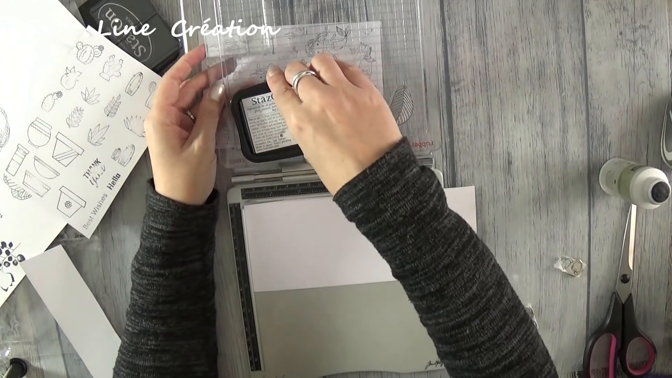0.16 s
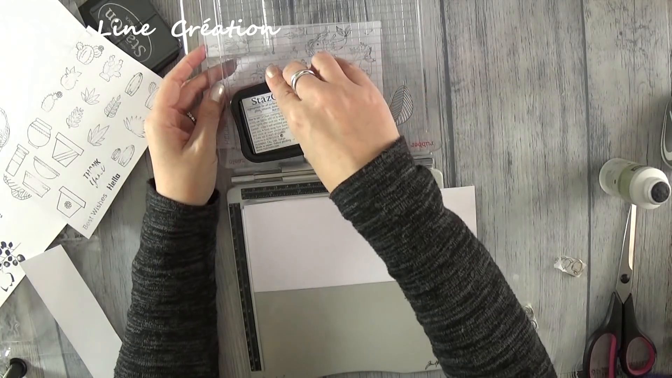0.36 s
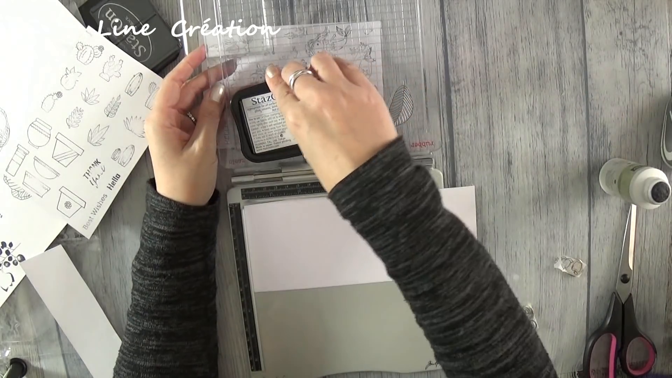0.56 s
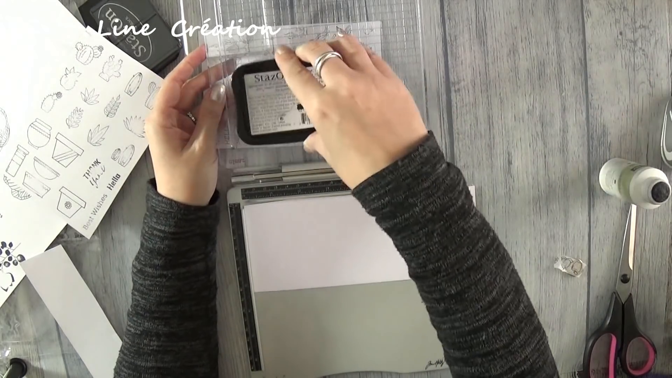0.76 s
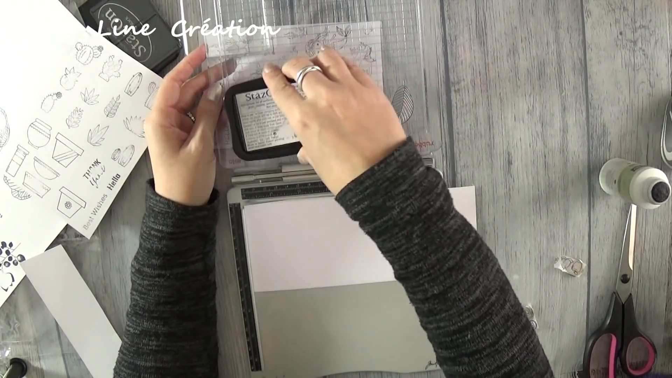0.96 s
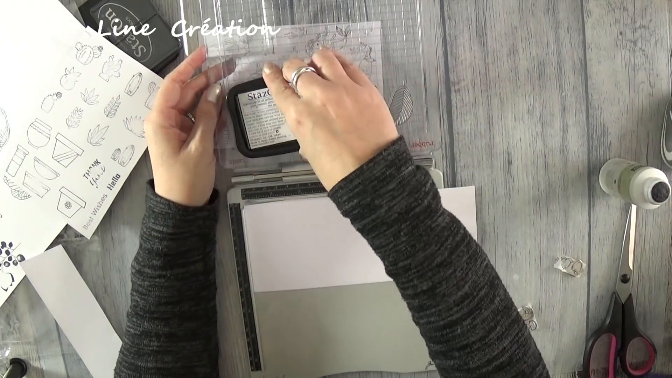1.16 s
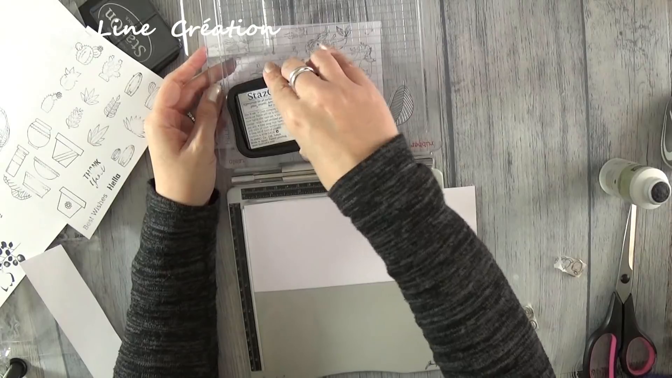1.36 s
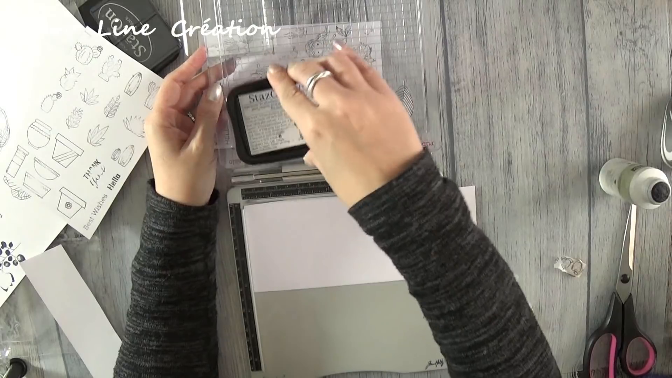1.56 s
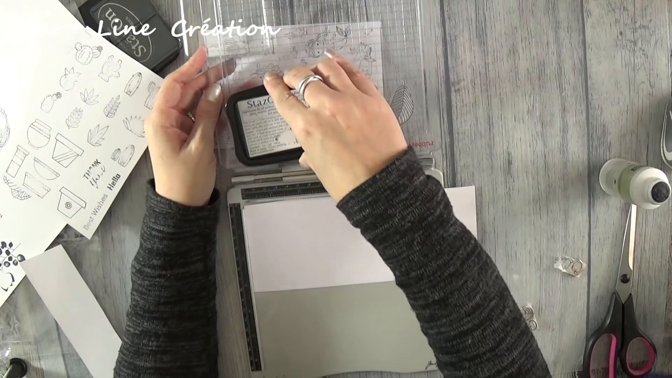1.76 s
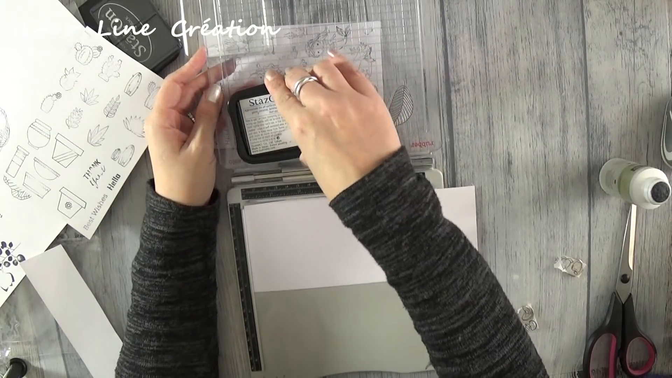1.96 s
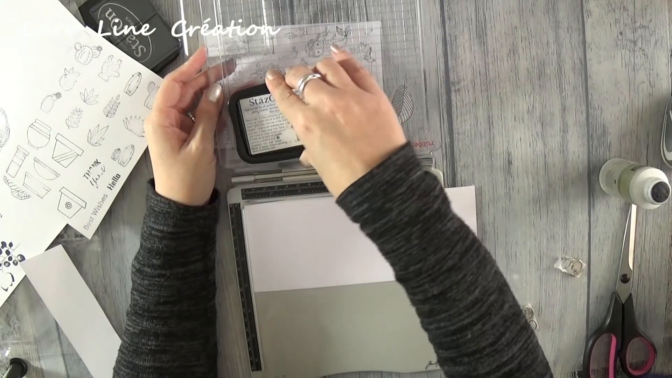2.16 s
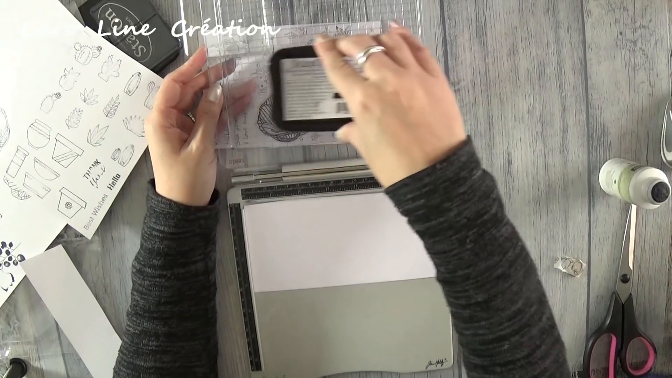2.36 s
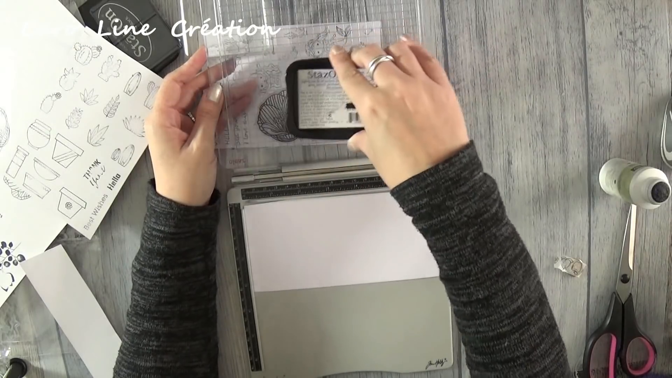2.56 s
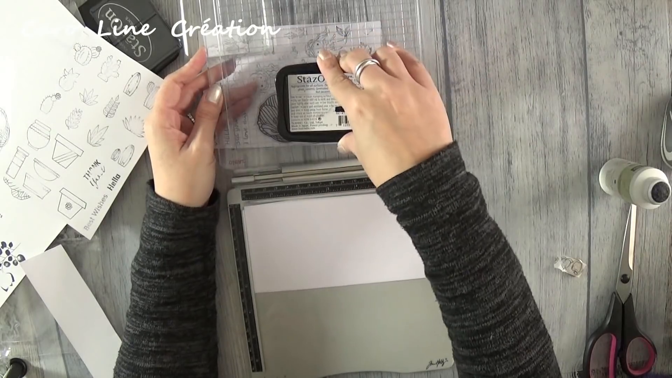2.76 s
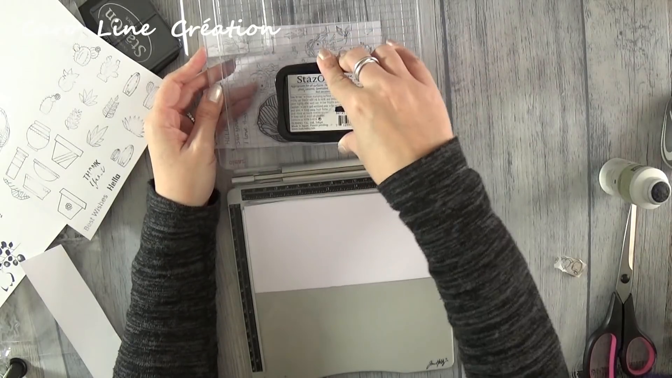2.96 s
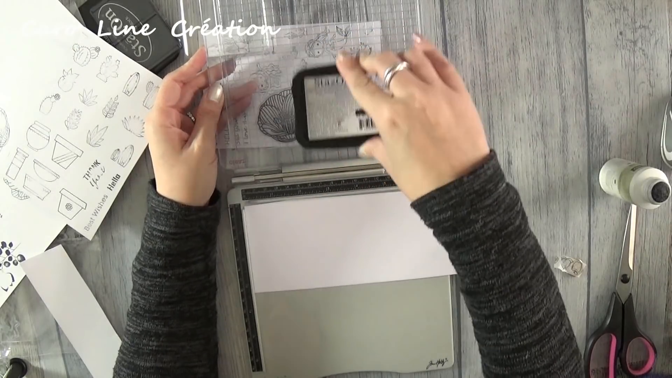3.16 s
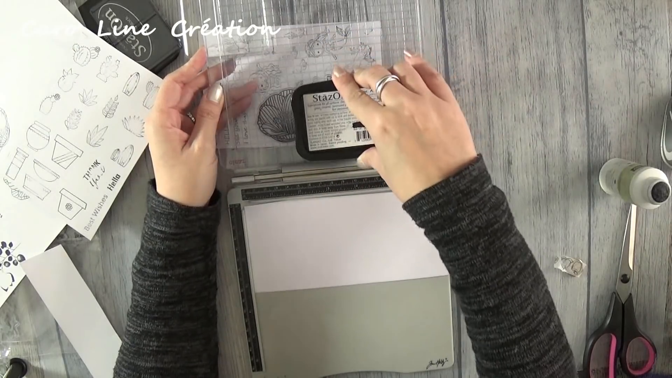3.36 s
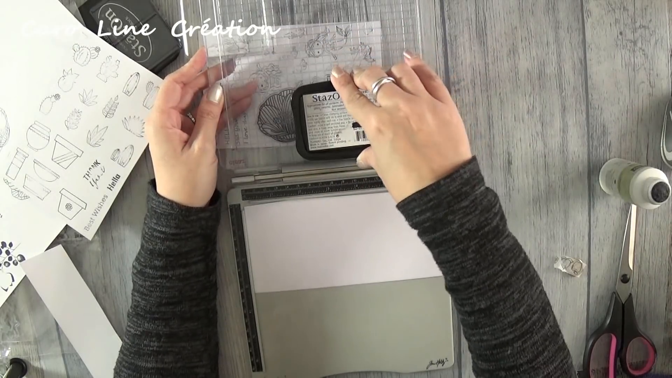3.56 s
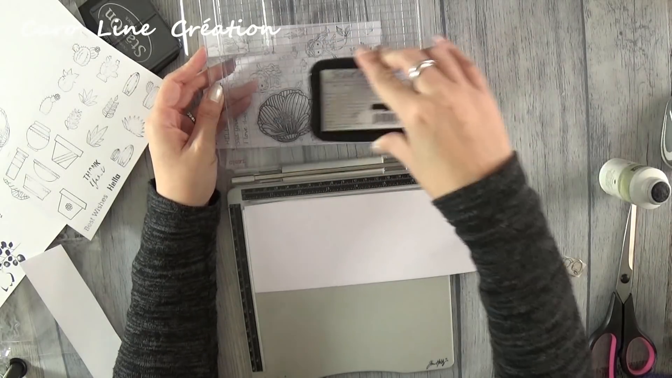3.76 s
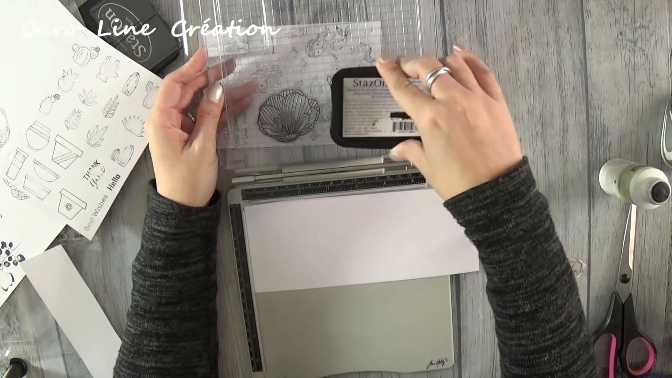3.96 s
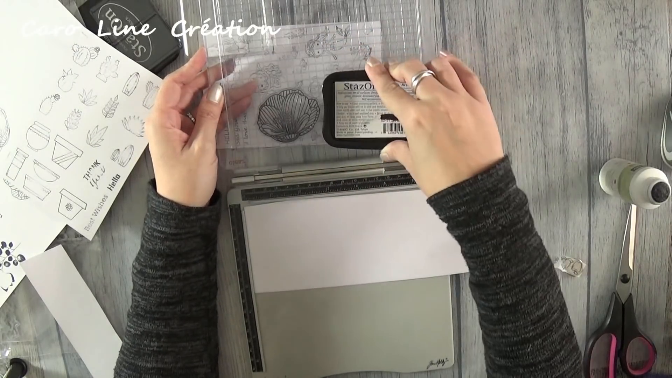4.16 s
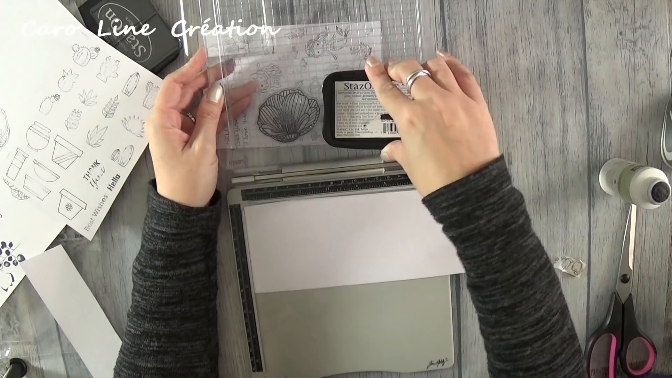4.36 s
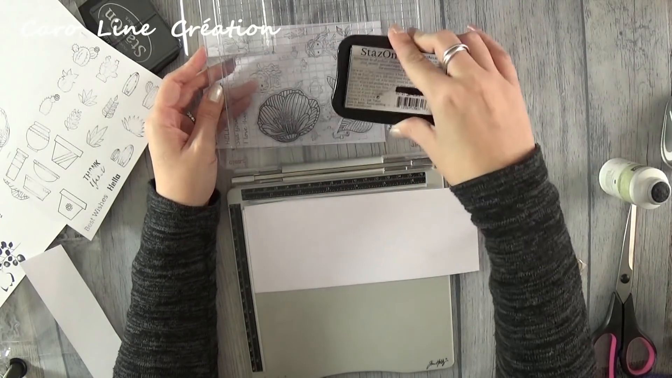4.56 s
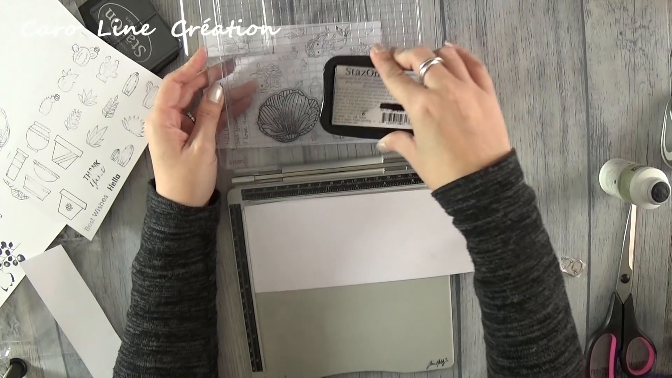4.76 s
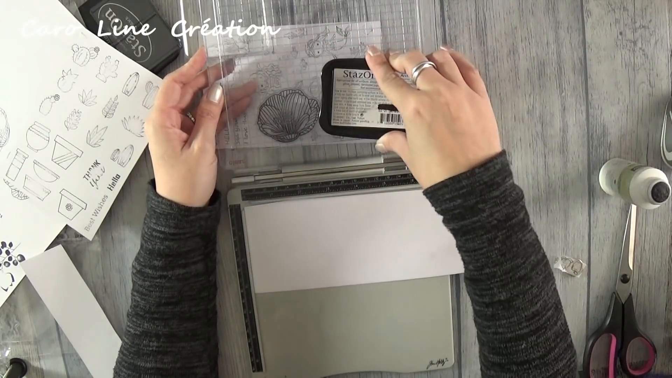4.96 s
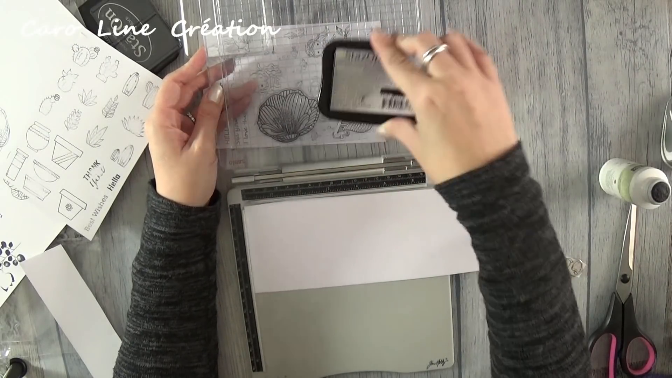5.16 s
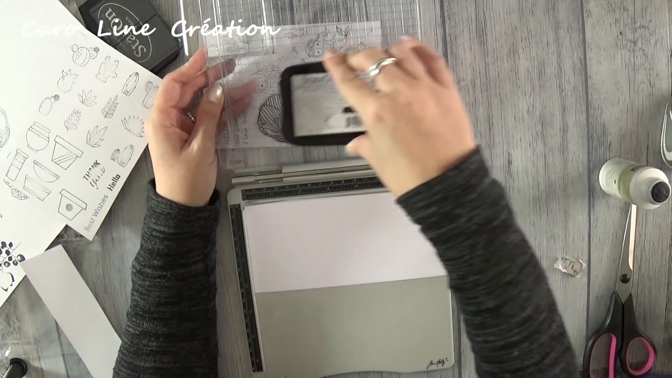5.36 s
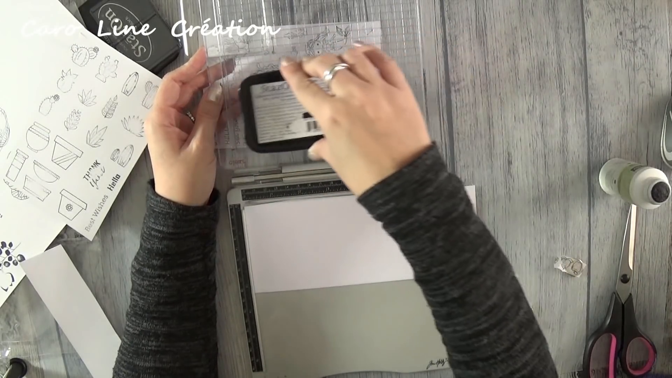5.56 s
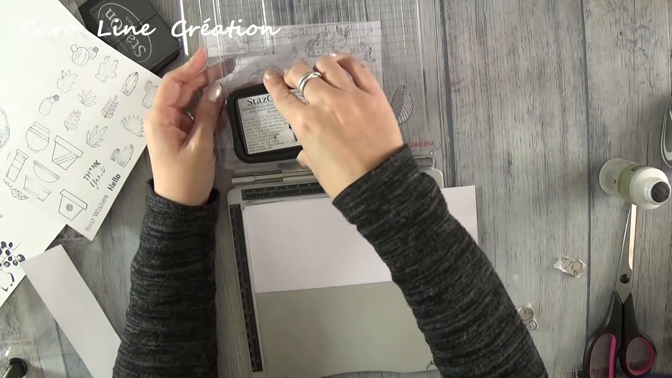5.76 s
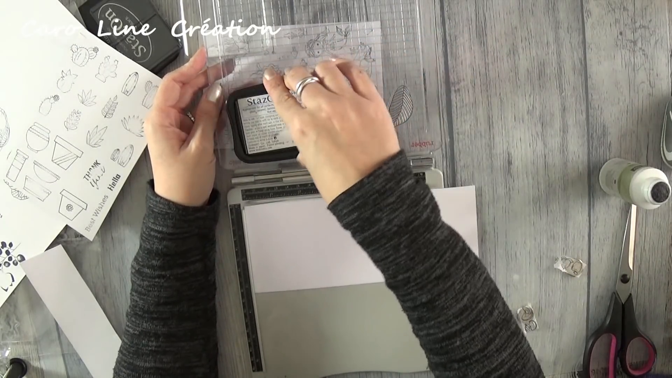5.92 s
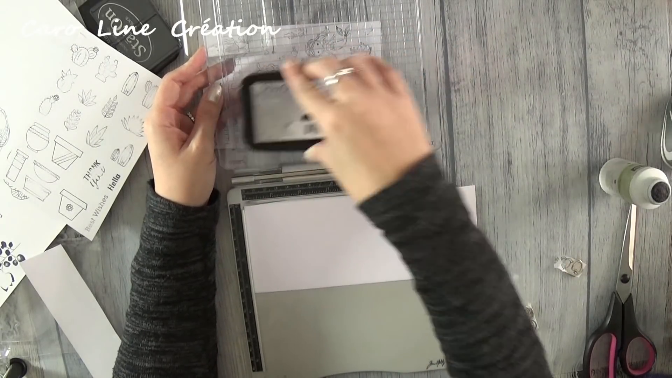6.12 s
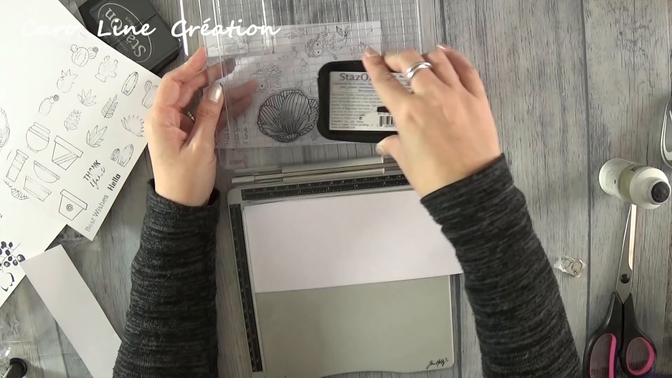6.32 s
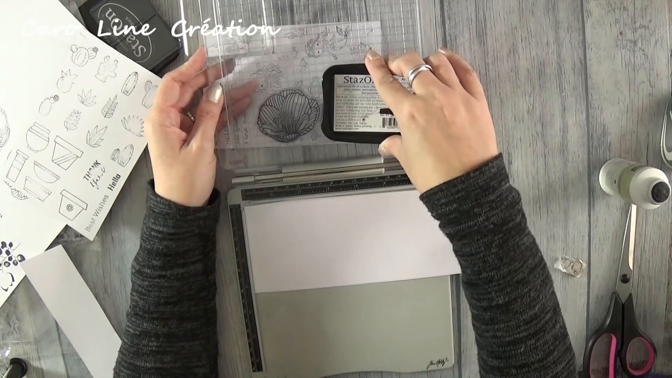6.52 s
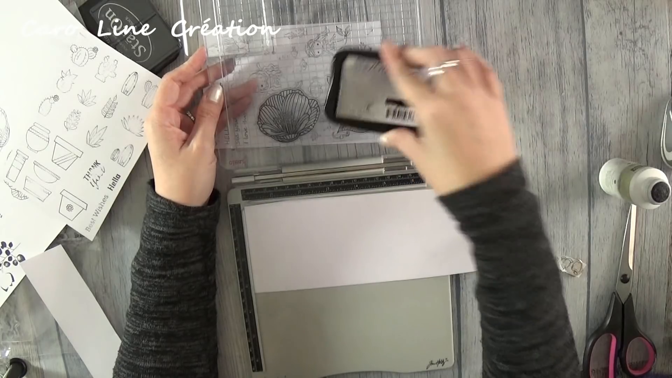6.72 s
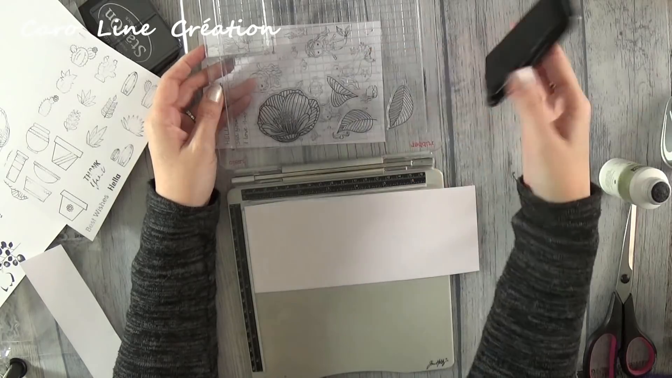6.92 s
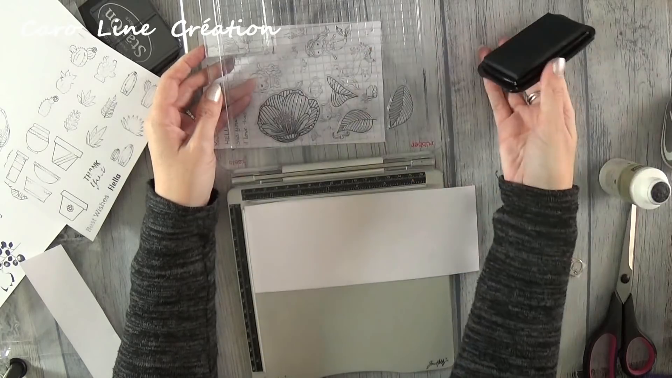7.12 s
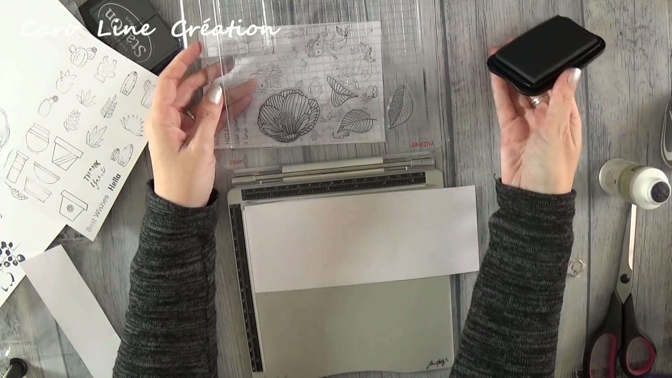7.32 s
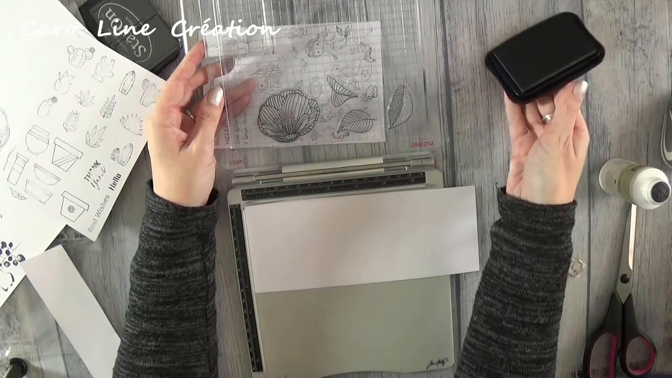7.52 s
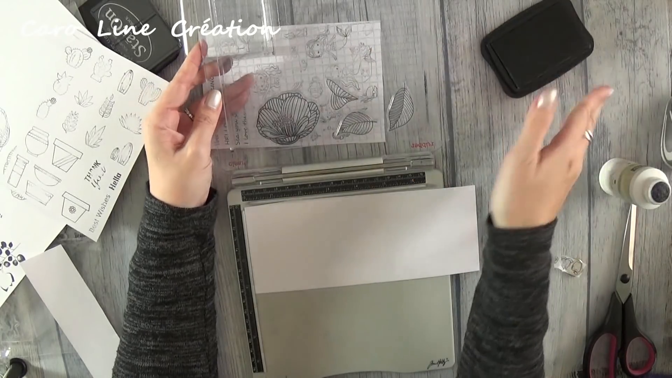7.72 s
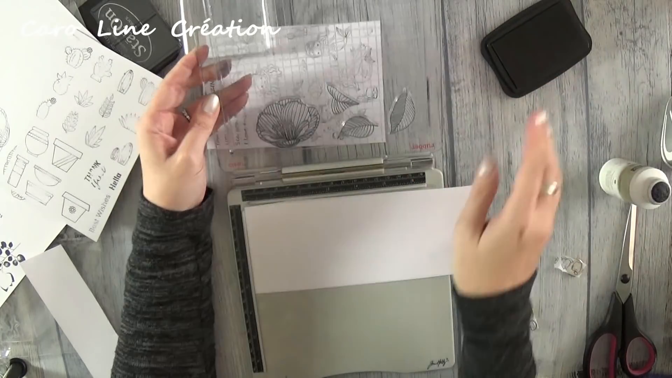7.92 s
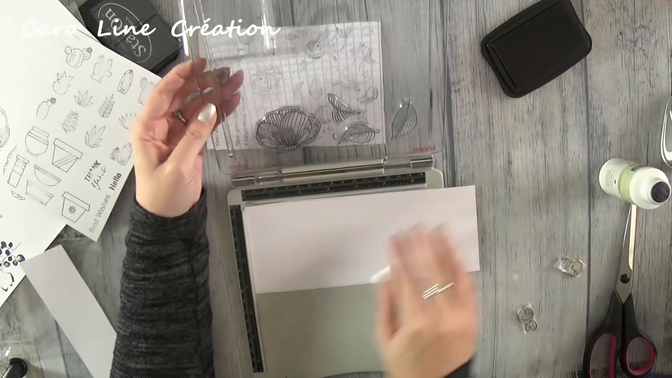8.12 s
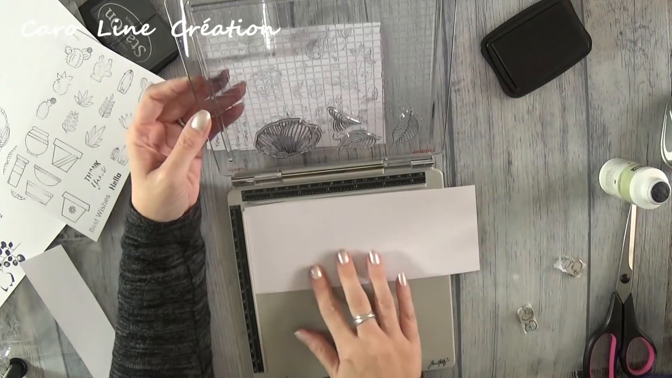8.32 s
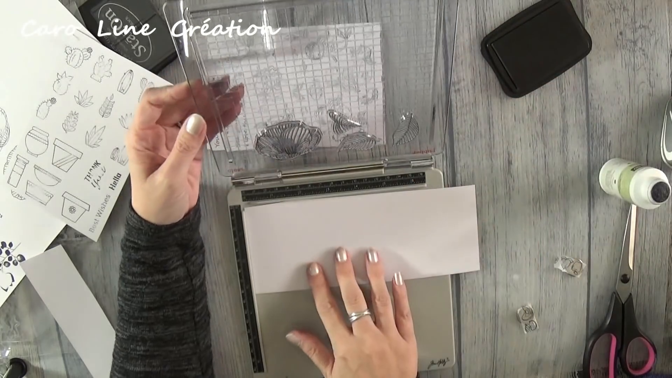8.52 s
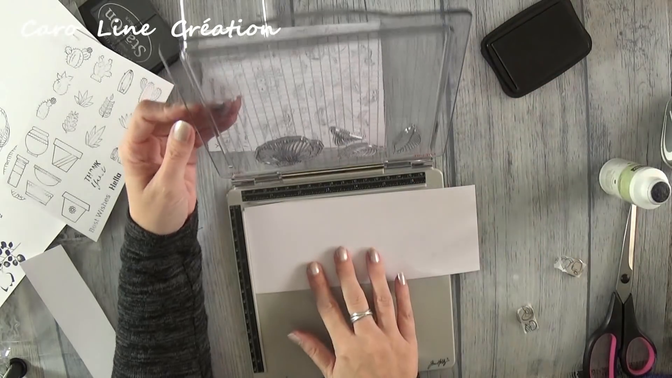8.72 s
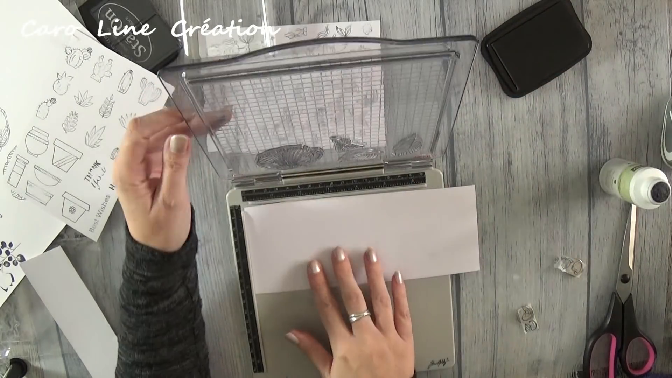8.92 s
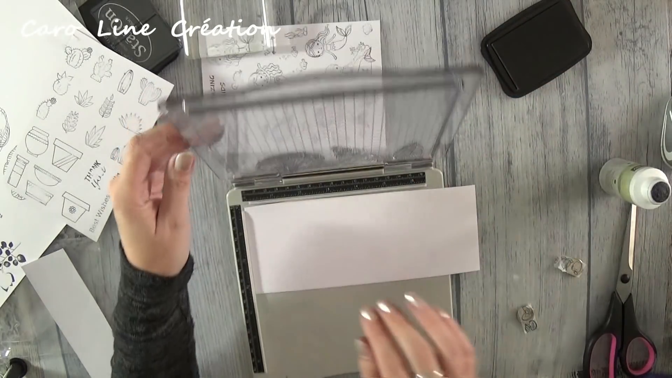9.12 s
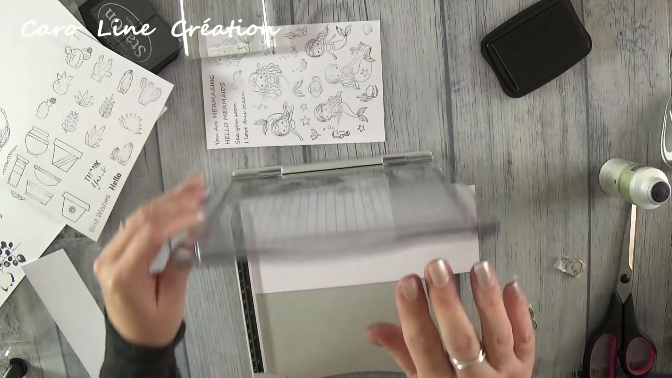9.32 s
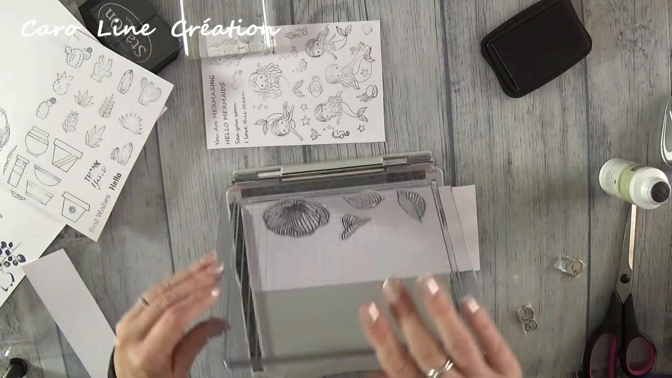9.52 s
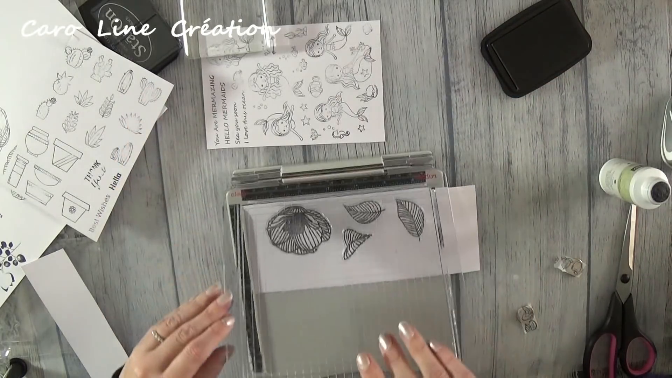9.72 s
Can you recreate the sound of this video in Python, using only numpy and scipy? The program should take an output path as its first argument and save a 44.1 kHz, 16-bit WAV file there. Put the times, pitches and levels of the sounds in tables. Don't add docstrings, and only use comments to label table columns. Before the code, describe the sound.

Soft hollow pats on plastic, tacky crackling peels and small case clicks, a hard plastic clack, hand rubbing on paper, and a clicking lid.

```python
import sys
import numpy as np
from scipy import signal
from scipy.fft import rfft, irfft
from scipy.io import wavfile

SR = 44100
rng = np.random.default_rng(int(sys.argv[2]) if len(sys.argv) > 2 else 0)


def pcm_store(signal):
    levels = np.round(np.clip(np.atleast_2d(signal), -1, 1) * 32767)
    wavfile.write(sys.argv[1], SR, levels.astype(np.int16).T)


def natural_amplitude(level_db):
    exponent = np.asarray(level_db, float) / 20
    return 10 ** exponent


N = 431298
BLOW = 8192

# (pitch_hz, level_db, t60_s)
TABLE_MODES = [(143, 1.5, 0.14), (161.2, 0, 0.17), (217.6, 1, 0.12), (293, -12, 0.027), (271, -2, 0.11)]
# (pitch_hz, level_db, t60_s)
LID_MODES = [(470, 3.5, 0.022), (605, -32, .03), (663, -9, 0.15), (886, 7.5, 0.021), (1087, 3.5, 0.017),
             (1460, 10.5, 0.0054)]
# (pitch_hz, level_db, t60_s)
CASE_MODES = [(1440, -7, 0.007), (1650, -28, 0.0071), (1950, 6.5, 0.0067), (2760, 9, 0.0046),
              (3185, 0.5, 0.021), (4300, 9.5, 0.0035), (4960, -5.5, 0.017)]


def rms_one(x):
    return x / np.sqrt(np.mean(x ** 2) + 1e-20)


def at_hz(points, hz):
    curve_hz, value = np.array(points).T
    return np.interp(np.log(hz), np.log(curve_hz), value)


def band(x, low_hz, high_hz):
    edges_hz = [low_hz, min(high_hz, .45 * SR)]
    return signal.sosfilt(signal.butter(2, edges_hz, "band", fs=SR, output="sos"), x)


def ring(x, hz, t60):
    r, w = natural_amplitude(-60 / (max(t60, .002) * SR)), 2 * np.pi * hz / SR
    return signal.lfilter([0, np.sin(w)], [1, -2 * r * np.cos(w), r * r], x)


def hiss():
    # (pitch_hz, level_db)
    colour = [(12, -54), (20, -24.5), (410, 4), (1910, 2.5), (2080, -0.5), (2260, 1), (2670, 1), (3160, -1),
              (3440, -3), (3840, -2.5), (4180, -2), (4670, -4), (8650, -6), (14700, -11), (16000, -21)]
    # (pitch_hz, correlation from -1 to 1)
    likeness = [(60, 0.8), (150, 0.89), (380, 0.16), (950, -0.06), (2380, -0.0028), (5980, 0.71),
                (15000, 1)]
    hz = np.maximum(np.arange(N // 2 + 1) * SR / N, 10)
    mid, side = rfft(rng.standard_normal((2, N))) * natural_amplitude(at_hz(colour, hz))
    alike = np.clip(at_hz(likeness, hz), -1, 1)
    spectrum = np.sqrt(1 + alike) * mid + np.sqrt(1 - alike) * side * [[1], [-1]]
    return natural_amplitude(-67) * rms_one(irfft(spectrum, N))


def whine():
    # (start_ms, length_ms, pitch_hz, even_frame_db, odd_frame_db)
    bursts = [
        (-3, 6, 3330, -68, -76),
        (-2, 6, 3560, -69, -76),
        (-3, 9, 2730, -73, -77),
        (-3, 15, 4185, -71, -72),
        (3, 7, 3360, -74, -81),
        (2, 24, 2065, -74, -74),
        (8, 12, 2765, -75, -75),
        (0, 18, 8385, -86, -87),
        (17, 6, 3520, -83, -83),
        (17, 6, 9420, -86, -86),
    ]
    level_db, wobble_db = 2.14, 1.8
    steady_hz, steady_db = 7817, -90
    frame = round(SR / 25)
    pattern = np.zeros(2 * frame)
    t_ms = np.arange(frame) / SR * 1000
    for start_ms, length_ms, hz, *dbs in bursts:
        phase = np.minimum(t_ms / length_ms, 1)
        burst = np.sin(np.pi * phase ** .75) * np.sin(2 * np.pi * hz * t_ms / 1000)
        for k, db in enumerate(dbs):
            start = k * frame + round(start_ms * SR / 1000)
            pattern += natural_amplitude(db) * np.roll(np.pad(burst, (0, frame)), start)
    frame_gains = natural_amplitude(level_db + wobble_db * rng.standard_normal(N // frame + 2))
    wobble = np.repeat(frame_gains, frame)[frame // 8:][:N]
    steady = natural_amplitude(steady_db) * np.sin(2 * np.pi * steady_hz * np.arange(N) / SR)
    return np.resize(pattern, N) * wobble + steady


def room(x):
    # (pitch_hz, t60_s)
    decay = [(100, 0.18), (500, 0.28), (2000, 0.2), (6000, 0.22), (14000, 0.24)]
    # (pitch_hz, side_share)
    width = [(100, 0.029), (300, 0.014), (1000, 0.37), (8000, 0.52), (11000, .5), (13000, 0.0737)]
    t = np.arange(SR // 2) / SR
    echo = 0
    for hz in 88 * 2. ** np.arange(8):
        noise = band(rng.standard_normal((2, len(t))), hz / np.sqrt(2), hz * np.sqrt(2))
        mid, side = noise * natural_amplitude(-60 * t / at_hz(decay, hz))
        echo = echo + mid + at_hz(width, hz * 1.1) * side * [[1], [-1]]
    echo = echo * np.clip(t / 0.0034 - 1, 0, 1)
    echo = echo / np.sqrt(np.sum(echo ** 2) / 2)
    return signal.fftconvolve(x[None], echo, axes=1)[:, :N]


def causal(magnitude):
    cepstrum = irfft(np.log(magnitude + 3e-4 * magnitude.max()))
    cepstrum[1:] *= 2 * np.clip(4 - 8 * np.arange(1, BLOW) / BLOW, 0, 1)
    return np.exp(rfft(cepstrum))


def mode_power(modes, chance_db, soft):
    f = np.arange(BLOW // 2 + 1) * SR / BLOW
    z = np.exp(-2j * np.pi * f / SR)
    power = 0
    for (hz, db, t60), c in zip(modes, chance_db):
        r, w = natural_amplitude(-60 / (max(t60, .002) * SR)), 2 * np.pi * hz / SR
        response = (1 - z * z) / 2 / (1 - 2 * r * np.cos(w) * z + r * r * z * z)
        power = power + np.abs(natural_amplitude(db + c) * response) ** 2 / (1 + (f / hz / soft) ** 4)
    return power


def hits(events, low_modes, body, t60, firm_s, low_db, body_db, crack_db, crack_hz, shell_db, soft, give=0):
    # (pitch_hz, level_db, t60_s)
    shell = [(8100, -14, 0.009), (9540, -34, 0.0051), (6900, -21, 0.0067), (11450, -20, 0.0037)]
    knock_cycles = 19
    firm_db = -22
    out, t = np.zeros(N + BLOW), np.arange(BLOW) / SR
    f = np.arange(BLOW // 2 + 1) * SR / BLOW + 1
    hump = (SR / 2 / (crack_hz[1] - crack_hz[0])) ** 2
    hump = hump / (1 + (crack_hz[0] / f) ** 4) / (1 + (f / crack_hz[1]) ** 8)
    for s, db, hz, crack, *thump in events:
        chance = 2.5 * rng.standard_normal(16)
        contact_s = firm_s * natural_amplitude(give * max(firm_db - db, 0))
        grain = rng.standard_normal(BLOW) * (t + contact_s / 4) * np.exp(-t / contact_s)
        contact = rfft(grain)
        spread = irfft(contact / causal(np.abs(contact)))
        smear = rfft(spread * np.exp(-(t / contact_s / 12) ** 2))
        knock = mode_power([(hz, 0, min(t60, knock_cycles / hz))], [0], soft)
        knock = knock + natural_amplitude(2 * body_db) * mode_power(body, chance, soft)
        low = natural_amplitude(2 * (sum(thump) + low_db)) * mode_power(low_modes, chance[::-1], soft)
        snap = hump + natural_amplitude(2 * shell_db) * mode_power(shell, chance[8:], soft)
        power = knock + low + natural_amplitude(2 * (crack + crack_db)) * snap
        blow = irfft(causal(np.sqrt(power)) * smear)
        start = round(s * SR)
        out[start:start + BLOW] += natural_amplitude(db) * blow / np.abs(blow).max()
    return out[:N]


def stroke(s, length_s, db):
    grip_s, slide_off_s, tire_db_per_s = 0.0086, 0.013, 18
    corners_s = [s - grip_s, s, s + length_s, s + length_s + slide_off_s]
    heights = [0, 1, natural_amplitude(-tire_db_per_s * length_s / 2), 0]
    return natural_amplitude(db) * np.interp(np.arange(N) / SR, corners_s, heights) ** 2


def rub():
    # (start_s, length_s, rasp_db, hiss_db re rasp)
    rubs = [(7.05, 0.12, -78, 8), (7.19, 0.28, -70, -8), (7.49, 0.14, -62.5, 0), (7.651, .095, -60, -4),
            (7.97, 0.33, -69.5, -3.5), (8.292, 0.1, -69, 10), (8.87, 0.18, -71.5, 0.5),
            (9.09, .12, -64, -9.5), (9.22, 0.24, -66.5, -7), (9.41, 0.066, -67, -25),
            (9.495, 0.27, -66.5, -10)]
    # (start_s, length_s, level_db, pitch_hz, width_hz)
    scrapes = [
        (7.502, 0.055, -71, 1470, 150),
        (7.537, 0.11, -67.5, 1950, 400),
        (7.67, 0.057, -55, 1840, 700),
        (8.31, .03, -74, 2400, 200),
        (9.095, 0.11, -65.5, 1485, 150),
        (9.103, 0.11, -72, 2300, 400),
        (9.41, 0.17, -81, 2300, 300),
        (8.987, 0.077, -71, 5250, 1200),
    ]
    # (low_hz, high_hz, level_db)
    paper_bands = [(3700, 5300, -16.5), (8340, 10300, -11)]
    gain = sum(stroke(s, length_s, db) for s, length_s, db, _ in rubs)
    bright = sum(stroke(s, length_s, db + hiss_db) for s, length_s, db, hiss_db in rubs)
    spikes = natural_amplitude(2.5 * np.minimum(rng.exponential(1, (2, N)), 4))
    grit, fine = rng.standard_normal((2, N)) * spikes
    grit = grit * natural_amplitude(2.5 * rms_one(band(rng.standard_normal(N), 15, 120)))
    fine = fine * natural_amplitude(2.2 * rms_one(band(rng.standard_normal(N), 10, 90)))
    rasp = rms_one(band(grit, 620, 3800))
    rasp = rasp + natural_amplitude(-11.0) * rms_one(band(grit, 140, 470))
    paper = rms_one(band(fine, 2670, 15000))
    for low_hz, high_hz, db in paper_bands:
        paper = paper + natural_amplitude(db) * rms_one(band(fine, low_hz, high_hz))
    out = gain * rasp + bright * paper
    for s, length_s, db, hz, width_hz in scrapes:
        out += stroke(s, length_s, db) * rms_one(band(grit, hz - width_hz / 2, hz + width_hz / 2))
    return out


def finger_ticks():
    # (start_s, knock_db, knock_hz, crack_db re knock)
    ticks = [(6.9217, -46, 3900, -6), (6.9606, -46.5, 2100, 0), (7.0641, -45, 2140, -5),
             (7.1474, -54, 1460, -30), (7.196, -43.5, 1920, -19), (7.2257, -30, 1810, -26),
             (7.2305, -36.5, 1620, -33), (7.325, -44.5, 4910, 2), (7.3674, -36, 1790, -18),
             (7.456, -41, 2630, -11), (7.4804, -57, 2030, 2), (7.5057, -43, 1600, -15),
             (7.6832, -39, 1800, -15), (7.6985, -46, 1810, -25), (8.4448, -52.5, 2760, -17),
             (8.651, -47, 4270, -35), (9.0867, -46, 3500, -17), (9.0955, -46, 1500, -39)]
    return hits(ticks, LID_MODES, CASE_MODES, t60=0.0045, firm_s=0.0013, low_db=-30.0, body_db=-20.5,
                crack_db=8.0, crack_hz=(3900, 8500), shell_db=-14, soft=1.3)


def pad_clicks():
    # (start_s, knock_db, knock_hz, crack_db re knock)
    clicks = [(0.02, -46.5, 3700, -26), (0.097, -46.5, 4870, -9), (0.4846, -46, 2730, 11),
              (0.6955, -46, 1450, -30), (1.199, -49, 3320, -23), (1.4309, -43, 2670, -29),
              (1.5675, -52.5, 1420, -40), (1.774, -48, 4450, -20), (2.193, -50, 3600, -21),
              (2.776, -57, 1000, -35), (2.7993, -18.5, 1570, -1.5), (2.7996, -28.5, 4250, -25),
              (2.7999, -25, 5830, -22), (2.8595, -22, 1650, -17), (3.0639, -35, 2230, -10),
              (3.7236, -38.5, 2200, -24), (3.8644, -44, 3730, -29), (5.135, -45, 1330, 19),
              (5.34, -49, 3700, -17), (5.3996, -54, 4260, -30), (5.7268, -46.5, 3900, -33),
              (6.113, -47, 1340, -2)]
    return hits(clicks, LID_MODES, CASE_MODES, t60=0.0072, firm_s=0.00072, low_db=-29.0, body_db=-21.5,
                crack_db=9.5, crack_hz=(3900, 8500), shell_db=-22, soft=4.2)


def corner_knocks():
    # (start_s, knock_db, knock_hz, crack_db re knock)
    corners = [
        (0.3103, -40.5, 1670, -32),
        (3.2802, -36.5, 1900, -39.5),
    ]
    return hits(corners, LID_MODES, CASE_MODES, t60=.011, firm_s=0.0014, low_db=-13.0, body_db=-25.5,
                crack_db=7.0, crack_hz=(3900, 8500), shell_db=-26, soft=6.6)


def hinge_closing():
    # (start_s, knock_db, knock_hz, crack_db re knock)
    clicks = [
        (9.3322, -40, 4500, -3),
        (9.3437, -37, 2240, -30),
        (9.4035, -31.5, 2780, -31),
        (9.4489, -39.5, 3560, -30),
        (9.4898, -35, 3540, -14),
        (9.5402, -38.5, 3960, -4),
        (9.5594, -49, 2520, -34),
        (9.617, -63, 2540, -12),
    ]
    # (pitch_hz, level_db, t60_s)
    latch = [(2300, -2, 0.013), (2600, -5.5, 0.031), (3560, -5, 0.02), (3930, -6, 0.014),
             (4630, 3.5, 0.0033), (7340, 3.5, 0.0023)]
    return hits(clicks, LID_MODES[1:], latch, t60=0.011, firm_s=0.0021, low_db=-23.0, body_db=-0.5,
                crack_db=14.5, crack_hz=(5500, 10500), shell_db=-22, soft=3.9)


def case_clacks():
    # (start_s, knock_db, knock_hz, crack_db re knock, table_thump_db re the usual)
    clacks = [
        (7.7465, -25, 1820, -28, -6),
        (7.7495, -24.5, 1900, -32, 0),
        (7.7572, -7.5, 1870, -21, 0),
        (7.758, -11.5, 3160, -21, -13),
        (7.8163, -20.5, 2600, -18, 5),
        (7.8182, -14, 1740, -23, -9),
        (7.838, -28, 1950, -16, -1),
        (7.866, -40, 3100, -21, -5),
    ]
    return hits(clacks, TABLE_MODES[3:] + LID_MODES, CASE_MODES, t60=0.0069, firm_s=0.00102, low_db=-25.0,
                body_db=-14.0, crack_db=18.5, crack_hz=(4000, 11000), shell_db=-7, soft=0.75)


def peel():
    # (tear_s, crackle_db, pull_s, brightness_db)
    peels = [
        (0.684, -47, .045, -9.5),
        (1.434, -51, 0.031, -10.5),
        (2.228, -53.5, 0.028, -8),
        (3.07, -49, 0.058, -10),
        (3.727, -52.5, 0.064, -6),
        (4.466, -51.5, 0.061, -8.5),
        (5.154, -49, 0.046, -11),
        (6.734, -57.5, 0.028, -15),
    ]
    pull_db, tear_s, let_go_db_per_s = 34, 0.0013, 1206
    snaps_per_s, flex_db = 13000, -19
    t, gain, bright = np.arange(N) / SR, 0, 0
    for s, db, pull_s, bright_db in peels:
        growth_db = pull_db * np.maximum(s - tear_s - t, 0) / pull_s
        decay_db = let_go_db_per_s * np.maximum(t - s - tear_s, 0)
        pull = natural_amplitude(db - growth_db - decay_db)
        gain = gain + pull
        bright = bright + natural_amplitude(bright_db) * pull
    sizes = natural_amplitude(1.0 * np.minimum(rng.exponential(1, N), 4)) * rng.choice([-1, 1], N)
    snaps = sizes * (rng.random(N) < snaps_per_s / SR) + 1e-18
    dealt = rng.integers(0, 10, N)
    body = 0
    for k, hz in enumerate(np.geomspace(850, 4500, 10)):
        body = body + ring(snaps * (dealt == k), hz, 1.3 / hz)
    flex = natural_amplitude(flex_db) * rms_one(band(snaps, 113, 200))
    crackle = rms_one(band(body, 550, 6900)) + flex
    return gain * crackle + bright * rms_one(band(snaps, 6200, 10700))


def pad_pats():
    # (start_s, knock_db, knock_hz, crack_db re knock,
    # table_thump_db re knock)
    pats = [(0.203, -50.5, 775, -23, -11), (1.118, -38, 300, -19, -12.5), (1.871, -31, 327, -23.5, -23.5),
            (2.097, -55, 534, -3, -10), (2.713, -47, 290, -10.5, -12), (3.429, -52, 778, 4, -5),
            (3.441, -43, 420, -14.5, -8.5), (4.153, -20.5, 410, -20, -27), (4.889, -23, 396, -22, -26),
            (5.82, -42.5, 396, -14, -11), (6.481, -39, 332, -15, -17), (8.517, -43.5, 895, -38, -28),
            (8.546, -49, 880, -19.5, -20), (8.891, -57.5, 907, -20, -14), (9.068, -47, 510, -8, -23),
            (9.104, -53, 476, -20, -17), (9.183, -52.5, 493, -12, -25), (9.337, -45, 713, -18, -18.5),
            (9.455, -52, 684, -29, -24), (9.54, -41, 630, -10.5, -30)]
    # (pitch_hz, level_db, t60_s)
    plate = [(423, -6, 0.14), (527, -10.5, 0.18), (611.3, -6, 0.12)]
    return hits(pats, TABLE_MODES, LID_MODES + plate, t60=0.041, give=0.39, firm_s=0.00155, low_db=4.5,
                body_db=-11.0, crack_db=22.0, crack_hz=(900, 4400), shell_db=-11, soft=2.0)


def scene():
    pats, hinge, clacks = pad_pats(), hinge_closing(), case_clacks()
    ahead = pats + corner_knocks() + pad_clicks() + finger_ticks() + hinge + peel() + rub()
    pan_db, treble_pan = -1.0, .2
    right = clacks * natural_amplitude([[pan_db / 2], [-pan_db / 2]])
    right = right + treble_pan * band(clacks, 6000, 11000) * [[-1], [1]]
    to_room = ahead + 1.18 * clacks - 0.35 * hinge - 0.14 * pats
    return ahead + right + natural_amplitude(-8.5) * room(to_room)


def low_pass(x):
    return signal.sosfilt(signal.butter(12, 16620, fs=SR, output="sos"), x)


def record(dry):
    x = signal.sosfilt(signal.butter(5, 127, "high", fs=SR, output="sos"), dry)
    x = x + natural_amplitude(-4) * band(dry, 30, 95)
    x = signal.sosfilt(signal.butter(2, 12000, fs=SR, output="sos"), x)
    return low_pass(x + whine() + hiss())


dry = scene()
out = record(dry)
pcm_store(out)
```